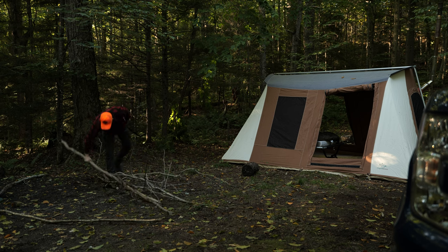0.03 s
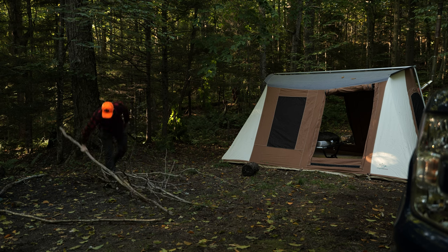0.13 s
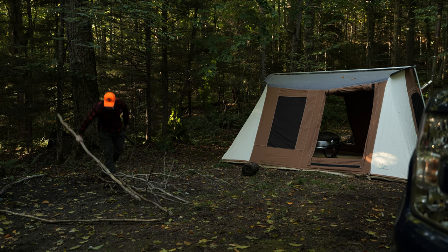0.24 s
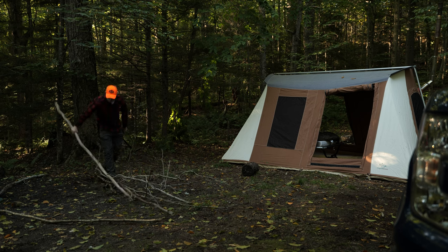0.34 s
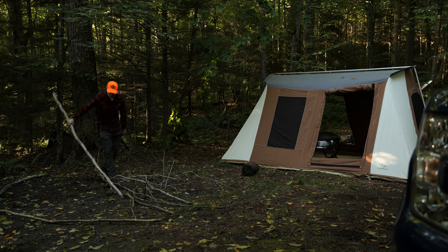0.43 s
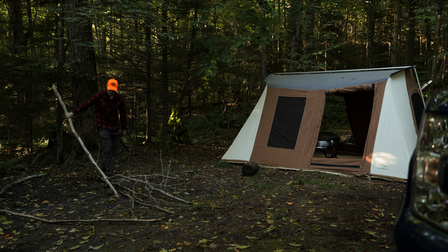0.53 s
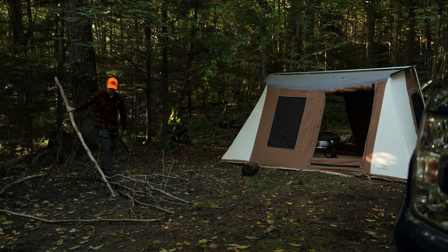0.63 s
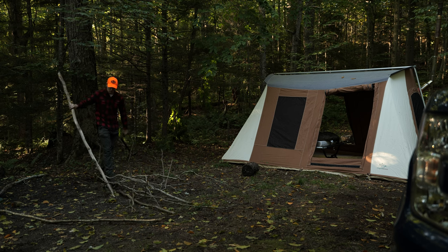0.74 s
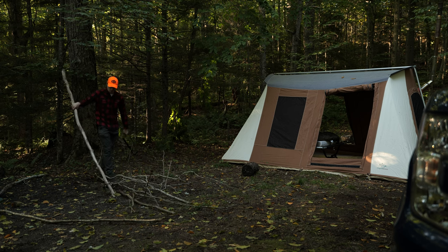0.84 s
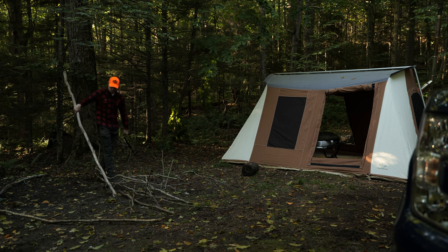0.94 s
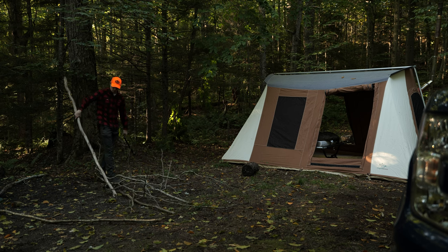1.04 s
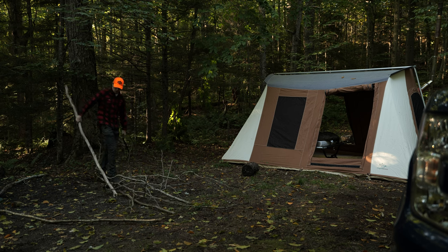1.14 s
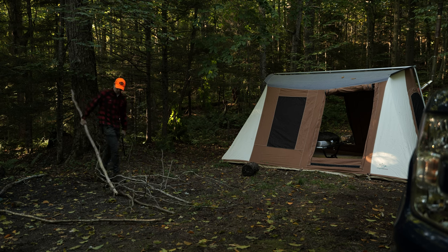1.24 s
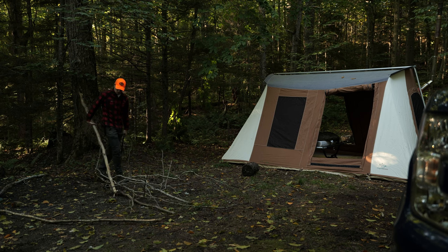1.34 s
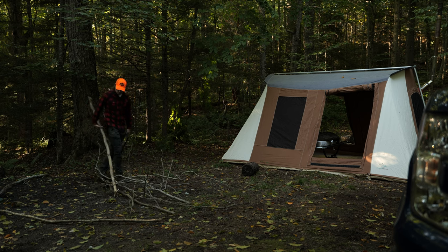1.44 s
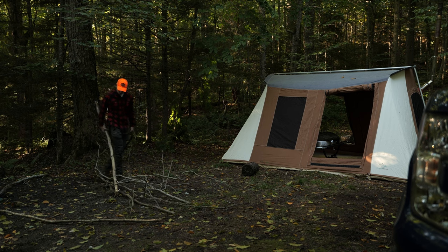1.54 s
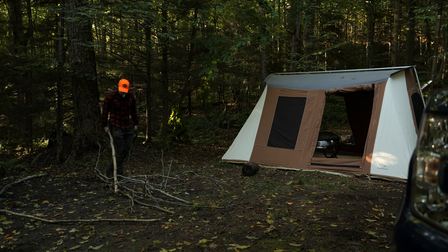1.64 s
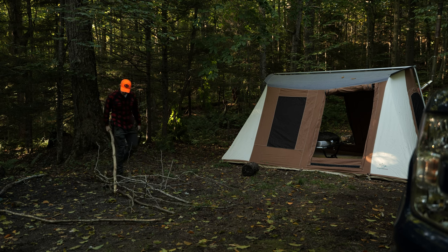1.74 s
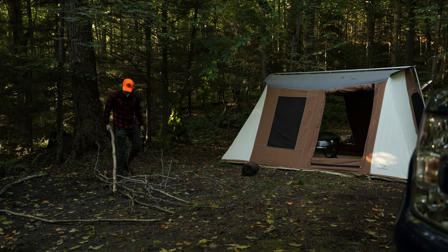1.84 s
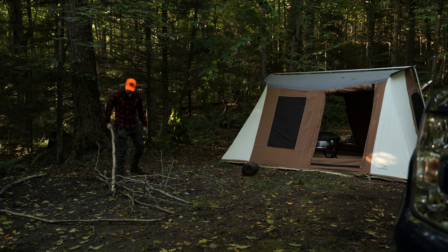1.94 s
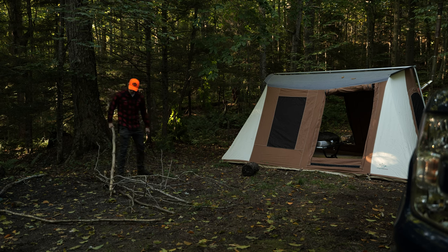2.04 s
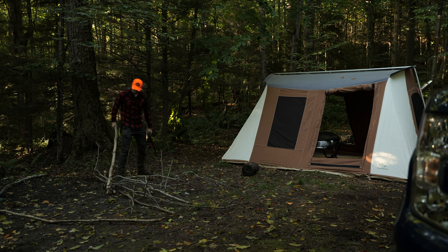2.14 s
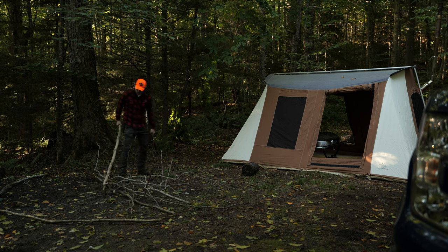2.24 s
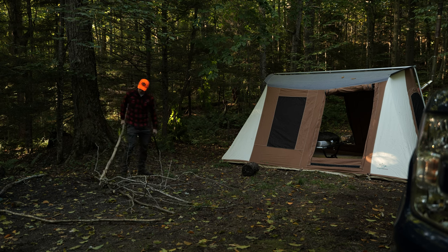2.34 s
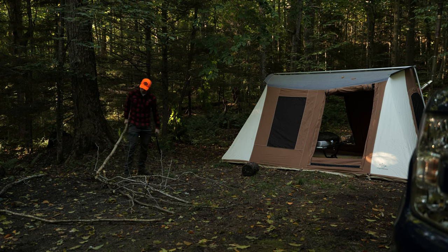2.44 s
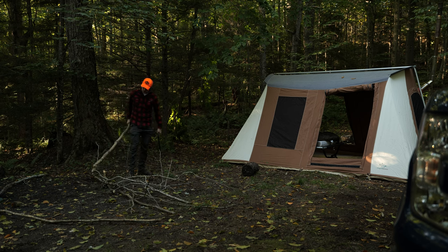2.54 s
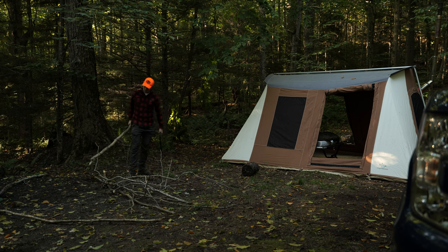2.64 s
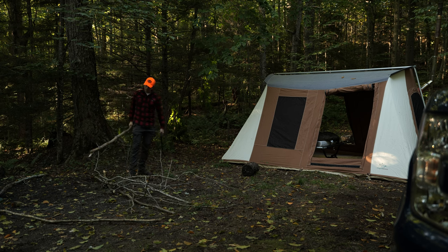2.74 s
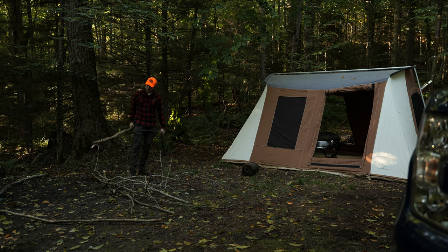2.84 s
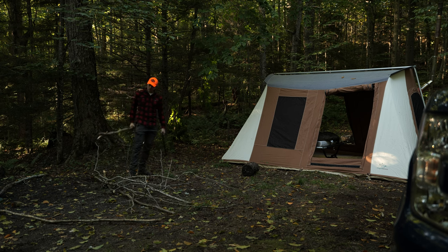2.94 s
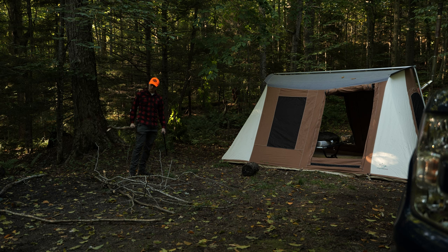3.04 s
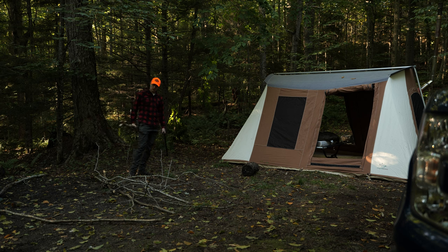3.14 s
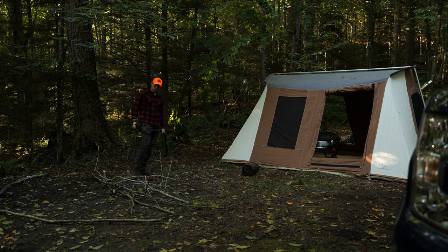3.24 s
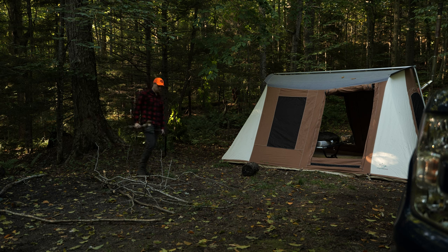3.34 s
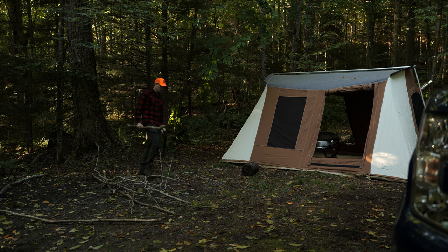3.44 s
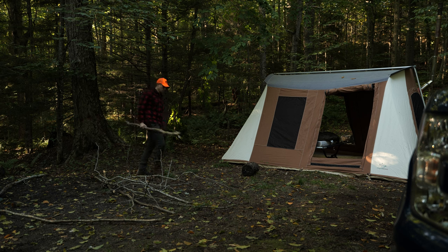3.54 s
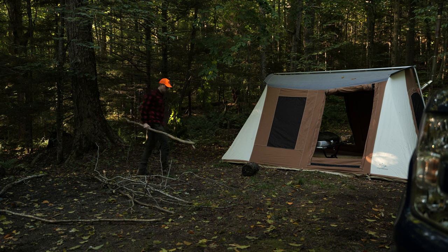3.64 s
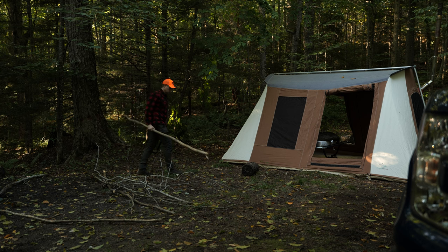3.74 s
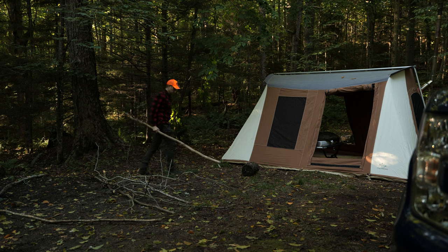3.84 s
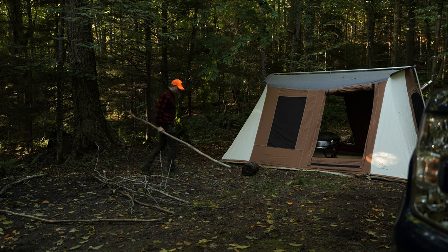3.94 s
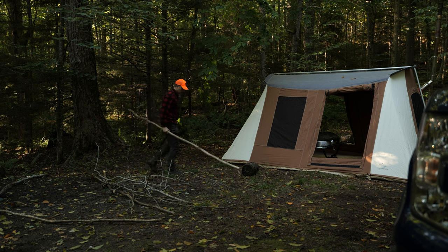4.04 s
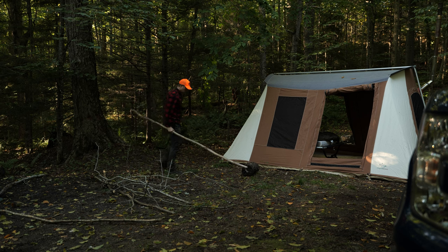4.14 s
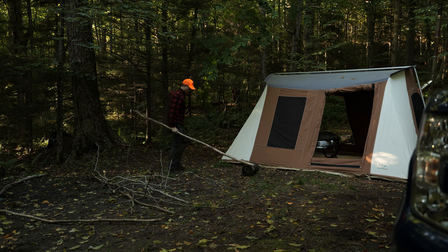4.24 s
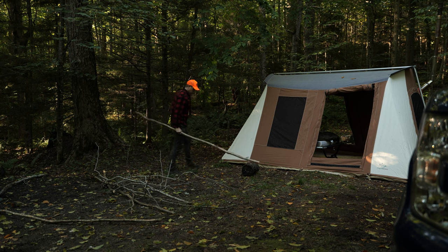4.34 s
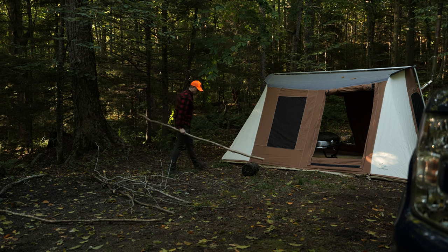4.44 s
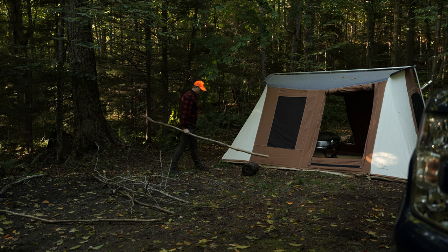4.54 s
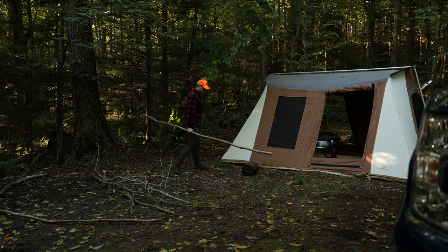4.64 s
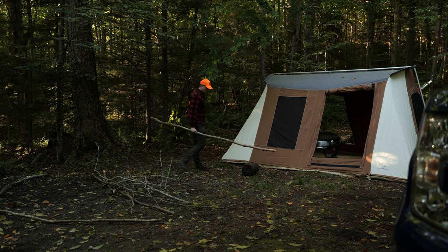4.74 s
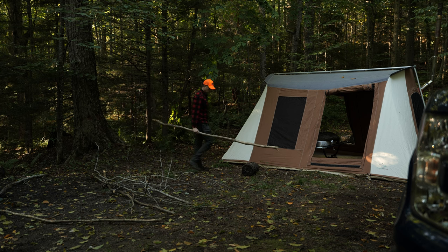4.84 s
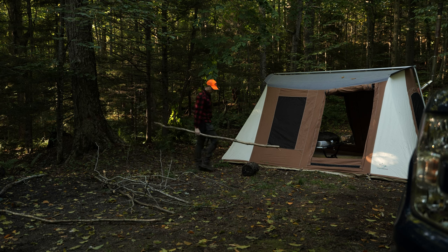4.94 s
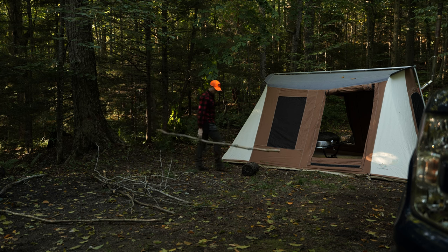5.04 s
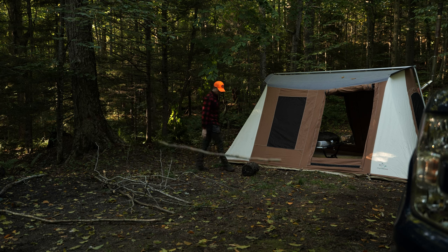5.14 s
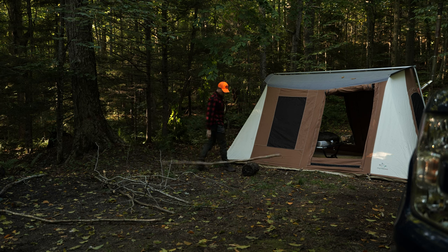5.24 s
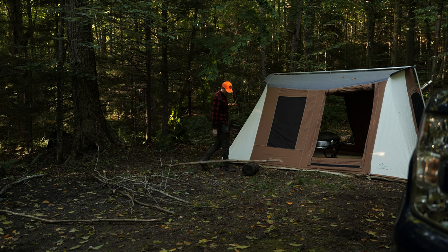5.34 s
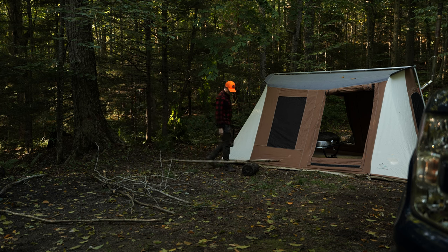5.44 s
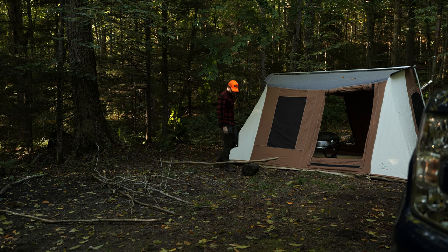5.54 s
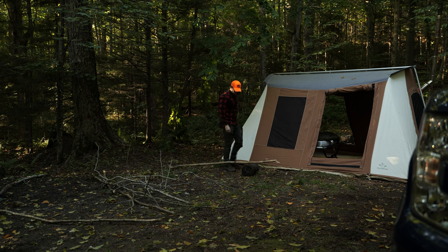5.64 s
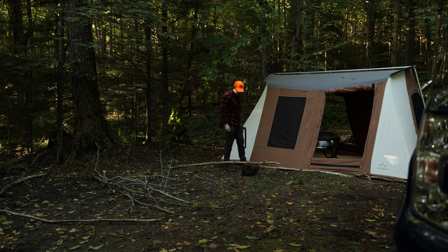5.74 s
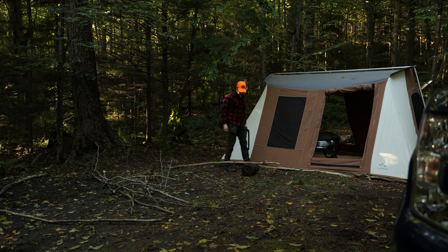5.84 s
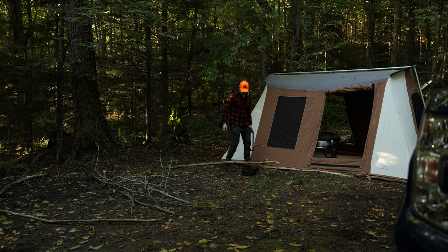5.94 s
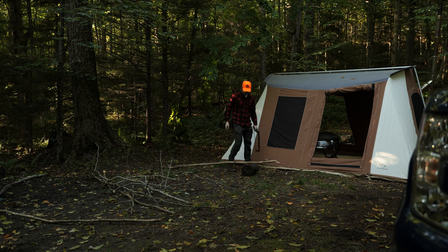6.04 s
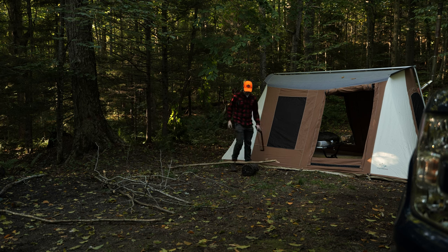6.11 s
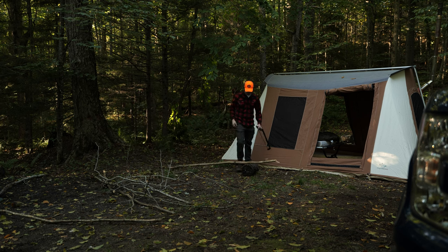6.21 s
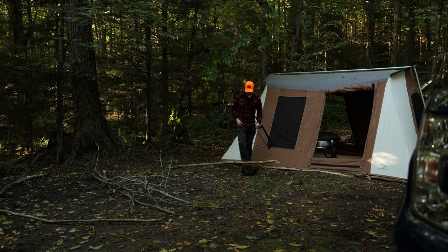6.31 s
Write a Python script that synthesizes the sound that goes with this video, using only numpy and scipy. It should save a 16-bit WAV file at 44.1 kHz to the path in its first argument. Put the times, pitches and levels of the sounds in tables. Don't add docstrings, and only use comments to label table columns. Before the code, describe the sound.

Quiet woodland heard from a distant, centred microphone, with soft steady wind, faint hiss and dull short echoes from trunks. From 0 to 0.65 seconds a dead branch is pulled from brush: thick leaf crackle, rough scraping, a sharp hollow knock near 0.28, rapid clatter and a low bump at 0.53. Smaller knocks and ticks come around 0.9 and 1.05. From 1.6 to 2.4 the tip catches, giving brittle snaps, rustles and a bright tap at 2.35. It thins to sparse ticks until 3.4, when soft leafy steps and popping sticks begin, firmer at 4.2 and 4.4 to 4.5. At 5.29 wood knocks down; at 5.38 comes the loudest deep thump with dry cracking, then bounces at 5.44, 5.59 and 5.73. Faint settling and leaf ticks fade into wind by 6.4.

```python
import sys
import numpy as np
from scipy import signal
from scipy.fft import rfft, irfft
from scipy.io import wavfile

SR = 44100
rng = np.random.default_rng(int(sys.argv[2]) if len(sys.argv) > 2 else 0)


def transcribe(signal):
    frames = np.atleast_2d(signal).T
    limited = np.clip(frames, -1, 1)
    pcm = np.round(limited * 32767).astype(np.int16)
    wavfile.write(sys.argv[1], SR, pcm)


def linear_from_db(decibels):
    return 10 ** (np.asarray(decibels, float) / 20)


N = 281005

# [f/Hz, density/dB per Hz]
SOIL_SPECTRUM = [(30, -7), (60, -7.5), (110, -1.5), (220, -2.5), (400, -8)]


def rms_one(x):
    return x / np.sqrt(np.mean(x ** 2) + 1e-20)


def coloured(x, spectrum):
    hz, db = np.transpose(spectrum)
    grid_hz = np.fft.rfftfreq(4096, 1 / SR) + 1
    gain = linear_from_db(np.interp(np.log(grid_hz), np.log(hz), db, left=-70, right=db[-1] - 20))
    cepstrum = irfft(np.log(gain))
    cepstrum[1:2048] *= 2
    cepstrum[2049:] = 0
    response = irfft(np.exp(rfft(cepstrum)))
    return signal.fftconvolve(x, response / np.linalg.norm(response))[:len(x)]


def drift(rate_hz):
    r = np.exp(-2 * np.pi * rate_hz / SR)
    smooth = signal.lfilter([1], [1, -2 * r, r * r], rng.standard_normal(N + SR))
    return rms_one(smooth[SR:])


def ring(x, hz, t60_s):
    r = linear_from_db(-60 / (t60_s * SR))
    w = 2 * np.pi * hz / SR
    return signal.lfilter([0, np.sin(w)], [1, -2 * r * np.cos(w), r * r], x)


def add(out, at_s, sound):
    at = round(at_s * SR)
    out[at:at + len(sound)] += sound[:N - at]


def wind():
    # [f/Hz, density/dB per Hz]
    spectrum = [(18, -47), (30, -17), (118, -6), (170, -9.5), (221, -3), (374, -4.5), (499, -2.5),
                (721, -4.5), (780, -4), (913, -7.5), (4080, -17), (16000, -23.5)]
    level_db = -63.5 + 0.083 * drift(0.82)
    return linear_from_db(level_db) * coloured(rng.standard_normal(N), spectrum)


def random_breaks(per_s, sizes):
    return sizes * rng.choice([-1, 1], N) * (rng.random(N) < per_s / SR)


def crackle(per_s, spread_db, clump_db, smooth):
    breaks = random_breaks(per_s, linear_from_db(spread_db * np.minimum(rng.exponential(1, N), 4)))
    mixed = rms_one(breaks) + smooth * rng.standard_normal(N)
    return rms_one(mixed * linear_from_db(clump_db * (drift(40) + 1.86 * drift(41))))


def shards(per_s, cycles):
    breaks = random_breaks(per_s, linear_from_db(2.1 * np.minimum(rng.exponential(1, N), 3)))
    pitches_hz = np.geomspace(1500, 7000, 12)
    dealt = rng.integers(0, 12, N)
    return rms_one(sum(ring(breaks * (dealt == k) + 1e-18, hz, cycles / hz)
                       for k, hz in enumerate(pitches_hz)))


def swells(rows, column=1):
    swell_db = 10
    t = np.arange(0, N + 32, 32) / SR
    power = 0
    for row in rows:
        peak_s, rise_s, fall_s = row[0], row[-2], row[-1]
        away = np.where(t < peak_s, (peak_s - t) / rise_s, (t - peak_s) / fall_s)
        power = power + linear_from_db(row[column] - swell_db * away) ** 2
    return np.interp(np.arange(N) / SR, t, np.sqrt(power))


def litter():
    # [peak t/s, crisp level/dB, crumple level/dB, rise/s, fall/s]
    sweeps = [(0.23, -42, -42.5, 0.056, 0.018), (0.32, -39, -39.5, 0.067, 0.085),
              (0.505, -46, -59, 0.024, 0.04), (0.41, -40.5, -36.5, 0.094, 0.025),
              (0.64, -49.5, -44.5, 0.38, 0.51), (0.92, -47, -44.5, 0.024, 0.029),
              (1.09, -58, -50.5, 0.083, 0.0074), (1.41, -55, -49.5, 0.047, 0.21),
              (1.585, -50, -52.5, 0.02, 0.031), (1.635, -52, -50, 0.024, 0.024),
              (1.685, -46.5, -40.5, 0.016, 0.025), (1.745, -50, -45, 0.032, 0.066),
              (1.9, -53, -53, 0.037, .03), (1.97, -48.5, -50.5, 0.042, 0.054),
              (2.13, -45, -44.5, 0.052, 0.059), (2.3, -52.5, -46.5, .05, .03),
              (2.362, -53, -50, .006, 0.073), (2.66, -54.5, -52, 0.19, 0.084)]
    # [peak t/s, crisp level/dB, crumple level/dB, rise/s, fall/s]
    treads = [(3.42, -52.5, -55.5, 0.083, 0.076), (3.72, -53, -66, 0.084, 0.11),
              (3.82, -52.5, -52, 0.094, 0.046), (3.875, -52, -57, 0.028, 0.011),
              (4.15, -61, -60, 0.079, 0.016), (4.195, -59, -54, 0.0066, 0.12), (4.374, -53, -51, .003, .2),
              (4.47, -43, -46, 0.047, 0.039), (4.52, -45, -56, .04, 0.036), (4.67, -58.5, -65, 0.11, 0.062),
              (4.04, -62, -62, 0.065, 0.053), (4.9, -56, -60, 0.081, 0.026),
              (5.09, -55.5, -58.5, 0.12, 0.034), (5.18, -55.5, -49.5, 0.036, .08),
              (5.292, -44, -36.5, 0.0094, 0.019), (5.33, -58, -43.5, 0.012, 0.089),
              (5.389, -41, -38, 0.007, 0.022), (5.44, -49, -42, 0.031, 0.045),
              (5.597, -55, -45.5, 0.0055, 0.018), (5.725, -46.5, -47, 0.031, 0.024),
              (5.8, -57, -55, 0.029, 0.071), (6.16, -66, -60.5, 0.22, 0.14), (6.365, -91, -71, .02, .05)]
    # [peak t/s, level/dB, rise/s, fall/s]
    scrapes = [(0.005, -46, 0.016, 0.45), (0.285, -30, 0.011, 0.024), (0.34, -43, .05, 0.39),
               (0.415, -35, 0.045, 0.04), (0.535, -34, 0.016, .03), (0.6, -48.5, 0.11, 0.16),
               (0.875, -48, 0.01, 0.1), (1.1, -48.5, 0.071, 0.0086), (1.41, -48.5, .03, 0.05),
               (1.585, -50, 0.032, 0.14), (1.69, -42, 0.015, 0.073), (1.95, -53.5, 0.22, 0.29),
               (2.05, -46, 0.0055, 0.13), (2.295, -43.5, 0.016, 0.037), (2.365, -35.5, 0.0068, 0.011),
               (2.66, -50.5, 0.11, 0.057), (3.75, -55.5, 0.068, 0.23), (4.195, -52, .01, 0.018),
               (4.42, -42.5, 0.032, 0.024), (4.5, -44, 0.043, 0.026), (5.295, -39, 0.0052, 0.034),
               (5.435, -35.5, 0.026, 0.027), (5.61, -47, 0.013, 0.016), (5.73, -51.5, 0.052, 0.014)]
    # [t/s, level/dB]
    effort = [(0, -52.5), (0.2, -57), (0.3, -51), (0.5, -59.5), (0.64, -54.5), (0.85, -68), (1.2, -69.5),
              (1.7, -69.5), (2.3, -64.5), (3.2, -73.5), (3.65, -66), (4, -67.5), (4.5, -65), (5, -69),
              (5.35, -67.5), (5.55, -63.5), (5.75, -67), (6.37, -70.5)]
    # [f/Hz, density/dB per Hz]
    crisp_spectrum = [(2060, -11), (3500, -11.5), (4080, -6.5), (4510, -5), (11700, -11), (13500, -11.5),
                      (16000, -14.5)]
    # [f/Hz, density/dB per Hz]
    crumple_spectrum = [(1200, -13.5), (2000, -7.5), (2600, -3.5), (3500, 1), (4200, -2.5), (6000, -15)]
    # [f/Hz, density/dB per Hz]
    scrape_spectrum = [(200, -10), (400, -5), (650, -4), (1050, -1), (1500, -11), (2400, -12)]

    effort_s, effort_db = np.transpose(effort)
    soil_db = np.interp(np.arange(N) / SR, effort_s, effort_db)
    stir = linear_from_db(soil_db - soil_db.mean())
    shared = crackle(1200, spread_db=-2, clump_db=1, smooth=0.78)

    own = crackle(4000, spread_db=-5, clump_db=0.6, smooth=0.77)
    crisp = coloured(rms_one(shared + 0.96 * own), crisp_spectrum)
    snaps = np.diff(crackle(140, spread_db=2.3, clump_db=2.5, smooth=0.054), prepend=0)
    crisp += 0.35 * coloured(snaps, crisp_spectrum)
    crisp *= np.hypot(linear_from_db(-3.5) * swells(sweeps + treads), linear_from_db(-69.5) * stir)

    own = crackle(1800, spread_db=-4, clump_db=1, smooth=0.24)
    crumple = coloured(rms_one(shared + 0.99 * own), crumple_spectrum)
    crumple += 0.4 * shards(per_s=200, cycles=10)
    crumple *= np.hypot(linear_from_db(-2.5) * swells(sweeps + treads, column=2), linear_from_db(-62.5) * stir)

    own = crackle(700, spread_db=0, clump_db=1, smooth=0.28)
    scrape = coloured(rms_one(0.59 * shared + own), scrape_spectrum)
    scrape *= np.hypot(linear_from_db(-5.5) * swells(scrapes), linear_from_db(-67.5) * stir)

    soil = coloured(crackle(200, spread_db=0, clump_db=0, smooth=1.64), SOIL_SPECTRUM)
    return crisp + crumple + scrape + linear_from_db(soil_db) * soil


def ticks():
    # [t/s, peak level/dB, centre f/Hz]
    leaf_breaks = [(0.0105, -29.5, 3400), (0.3725, -28, 3900), (0.427, -29, 3500), (0.6195, -38.5, 3720),
                   (0.9207, -34, 3300), (0.9554, -45, 3540), (1.0385, -38, 5000), (1.0415, -47, 3200),
                   (1.045, -41.5, 3250), (1.047, -43, 5100), (1.085, -47, 4800), (1.304, -51, 3490),
                   (1.571, -45, 3460), (1.625, -42.5, 3190), (1.672, -35.5, 3420), (1.731, -32.5, 2900),
                   (1.7365, -31, 3180), (1.75, -35, 3300), (1.8842, -35, 3040), (1.8921, -36.5, 2900),
                   (1.9333, -47, 3730), (1.964, -36, 3420), (1.968, -38, 3570), (1.9762, -32.5, 3540),
                   (1.982, -42, 2800), (2.08, -45, 3420), (2.122, -39, 3620), (2.284, -39, 2570),
                   (2.354, -31.5, 3630), (2.4022, -46, 3000), (2.9093, -44, 4200), (3.1337, -47, 3760),
                   (3.4357, -44, 3260), (3.74, -39.5, 3280), (3.869, -39, 4000), (3.9946, -56, 3240),
                   (4.3715, -42, 3870), (4.3806, -38, 3320), (4.4652, -39, 8000), (4.4904, -35, 3500),
                   (5.3817, -19, 3580), (5.3845, -19.5, 3650), (5.393, -38, 3600), (5.4415, -24.5, 3650),
                   (5.441, -29, 5200), (5.6723, -43, 3780), (5.7235, -29, 3170), (6.3567, -40.5, 3250)]
    # [t/s, peak level/dB, centre f/Hz]
    stem_breaks = [(0.862, -37.5, 9000), (1.04, -50, 5200), (1.179, -51, 11000), (1.6769, -33.5, 6460),
                   (1.7434, -26.5, 6050), (1.9333, -34, 13000), (1.957, -41, 7060), (2.0796, -31.5, 6330),
                   (2.3542, -33, 10700), (3.6037, -43, 9530), (3.8044, -42, 6490), (4.1829, -43, 10000),
                   (4.437, -31, 6280), (4.49, -30, 7850), (5.298, -31, 10000), (5.3815, -21.5, 5500),
                   (5.428, -25, 5800), (5.886, -37, 13400)]
    out, t = np.zeros(N), np.arange(SR // 40) / SR
    for rows, burst_s, cycles, edge in (leaf_breaks, 0.0018, 16, 0.07), (stem_breaks, 0.0007, 4, 0.45):
        for at_s, peak_db, hz in rows:
            snap = np.diff(rng.standard_normal(len(t) + 1)) * np.exp(-t / burst_s)
            body = ring(snap, hz, cycles / hz)
            add(out, at_s, linear_from_db(peak_db) * (body / abs(body).max() + edge * snap / abs(snap).max()))
    return out


def thumps():
    # [t/s, peak level/dB, first f/Hz, last f/Hz, time until the soil stops it/s]
    blows = [(0.026, -43, 120, 76, 0.089), (0.256, -38, 338, 201, .012), (0.531, -30.5, 266, 97, 0.062),
             (1.73, -43, 231, 108, 0.025), (4.421, -49, 350, 250, 0.013), (5.288, -37, 150, 70, 0.061),
             (5.3843, -13, 360, 98, .032), (5.44, -36.5, 201, 62.4, 0.25), (5.59, -38, 198, 97, 0.024),
             (5.7295, -30, 140, 92, .028), (5.791, -40, 120, 62.4, 0.2)]
    t60_s, grit_cut_hz = 0.67, 630
    out, t = np.zeros(N), np.arange(SR // 2) / SR
    soil_lowpass = signal.butter(2, grit_cut_hz, fs=SR, output="sos")
    for at_s, peak_db, first_hz, last_hz, held_s in blows:
        turns = np.cumsum(last_hz + (first_hz - last_hz) * np.exp(-t / 0.005)) / SR
        shape = (1 - np.exp(-t / 0.0003)) * (0.28 + 0.72 * np.exp(-t / 0.003))
        shape *= 0.053 + 0.81 * np.exp(-np.maximum(t - held_s, 0) / 0.019)
        upper = 0.28 * (1 - np.exp(-t / 0.037)) * np.exp(-t / 0.099) * np.sin(2 * np.pi * 160 * t)
        grit = 0.35 * coloured(rng.standard_normal(len(t)), SOIL_SPECTRUM)
        grit = signal.sosfilt(soil_lowpass, grit)
        level = linear_from_db(peak_db - 60 * t / t60_s)
        add(out, at_s, level * shape * (np.sin(2 * np.pi * turns) + upper + grit))
    return out


def knocks():
    # [t/s, peak level/dB, ring f/Hz,
    # t60/s]
    wood_blows = [(0.11, -38.5, 1140, 0.037), (0.258, -33.5, 300, .02), (0.2755, -23, 1110, .03),
                  (0.2774, -15.5, 1057, 0.026), (0.2816, -23, 1160, .03), (0.289, -29, 483, .03),
                  (0.323, -29, 1160, .03), (0.327, -29, 1160, .03), (0.333, -28, 1150, .025),
                  (0.341, -28, 1060, 0.027), (0.346, -39, 1130, 0.027), (0.357, -30, 1130, 0.021),
                  (0.3655, -31, 1030, 0.022), (0.381, -30.5, 1100, 0.027), (0.414, -32, 1110, 0.025),
                  (0.416, -35.5, 440, 0.056), (0.502, -37, 514, .025), (0.5235, -29.5, 616, 0.026),
                  (0.5275, -25.5, 800, .03), (0.536, -33, 380, .04), (0.549, -35.5, 563, 0.052),
                  (0.711, -47.5, 255, .03), (0.8616, -36.5, 1000, 0.035), (0.8675, -36, 906, 0.041),
                  (0.8944, -34, 1670, 0.022), (0.897, -35, 950, 0.04), (0.956, -43, 900, 0.013),
                  (1.092, -43, 1200, 0.022), (1.682, -33.5, 1710, .05), (1.692, -37.5, 915, 0.042),
                  (1.695, -38, 1700, 0.037), (1.715, -43, 630, .04), (2.0443, -33, 590, 0.014),
                  (2.284, -48, 900, .02), (2.3, -45, 595, 0.016), (2.354, -25.5, 1740, .01),
                  (2.3575, -29.5, 1020, 0.036), (5.2848, -18.5, 629, 0.042), (5.2855, -28.5, 362, 0.047),
                  (5.287, -32.5, 990, 0.031), (5.287, -33, 1780, 0.024), (5.303, -35, 690, .03),
                  (5.333, -38, 1404, 0.034), (5.354, -39, 1390, .03), (5.428, -38, 840, 0.037),
                  (3.6335, -40.5, 515, 0.015), (3.6525, -42.5, 320, .03), (3.671, -42.5, 427, 0.016),
                  (3.787, -41.5, 338, .02), (4.154, -44, 990, .02), (4.183, -34, 1140, 0.016),
                  (4.2, -35, 1260, .02), (4.272, -50, 690, 0.034), (4.4035, -39, 810, 0.013),
                  (4.408, -38.5, 1020, 0.018), (4.422, -37.5, 520, 0.026), (5.3845, -22.5, 243, 0.035),
                  (5.391, -28, 190, 0.16), (5.4268, -29.5, 705, .02), (5.718, -40.5, 324, 0.025),
                  (5.901, -46.5, 1000, .02), (5.73, -37, 111, 0.082)]
    rise_cycles = 0.28
    out, t = np.zeros(N), np.arange(SR // 8) / SR
    for at_s, peak_db, hz, t60_s in wood_blows:
        shape = (1 - np.exp(-t * hz / rise_cycles)) * linear_from_db(-60 * t / t60_s)
        wood = shape * (np.sin(2 * np.pi * hz * t) + 0.27 * np.sin(2 * np.pi * 1.17 * hz * t))
        add(out, at_s, linear_from_db(peak_db) * wood / abs(wood).max())
    return out


def twigs():
    # [t/s, peak level/dB, ring f/Hz, crack level/dB]
    pile_hits = [(0.16, -38, 2120, -10), (0.271, -22.5, 925, -3.5), (0.293, -30, 2530, 2),
                 (0.3, -27.5, 930, 1), (0.323, -38, 1190, -13), (0.335, -40, 1190, -10),
                 (0.358, -35, 1150, -4), (0.393, -46, 1190, 13), (0.409, -28.5, 1060, -6),
                 (0.496, -37, 457, -9), (0.522, -30.5, 2060, -0.5), (0.53, -32.5, 410, 1),
                 (0.531, -31, 610, -13), (0.596, -35.5, 980, -14), (0.86, -39, 1620, -16),
                 (0.897, -44, 909, 8), (1.037, -51, 1220, 13.5), (1.179, -50.5, 2000, 1)]
    # [t/s, peak level/dB, ring f/Hz, crack level/dB]
    tip_hits = [(1.676, -40, 1630, 3.5), (1.681, -36, 1700, -12), (1.68, -39, 940, -15),
                (1.733, -36.5, 1580, 1), (1.883, -45, 870, -8), (1.976, -52, 915, 10),
                (2.045, -42, 460, -22), (2.045, -38, 770, -14), (2.159, -41.5, 1250, 0),
                (2.253, -50, 1160, 6), (2.353, -34.5, 1770, 6.5), (2.36, -37, 1020, -6),
                (2.402, -50, 2020, 2)]
    # [t/s, peak level/dB, ring f/Hz, crack level/dB]
    boot_hits = [
        (3.408, -47.5, 1390, 5.5),
        (3.781, -52, 1400, 13),
        (4.183, -40.5, 1370, 5.5),
        (4.199, -45, 1300, 8),
        (4.236, -49, 1250, -11),
        (4.422, -46, 530, 9),
        (4.499, -44.5, 647, 10),
        (5.163, -60, 2270, 17),
    ]
    # [t/s, peak level/dB, ring f/Hz, crack level/dB]
    drop_hits = [
        (5.286, -27, 785, 4.5),
        (5.323, -41, 1400, 13),
        (5.333, -39, 1420, -17),
        (5.355, -39, 1410, -5),
        (5.427, -28, 464, -9),
        (5.44, -31.5, 460, -2),
        (5.59, -34, 477, 3.5),
        (5.7, -52, 900, 13),
        (5.719, -49, 1180, 9),
        (5.901, -48, 447, -5),
    ]
    # [ring t60/s, contact/s]
    pile_wood = (0.016, 0.0048)
    tip_wood = (0.023, 0.0044)
    boot_wood = (0.013, 0.0035)
    drop_wood = (0.032, 0.0048)
    # [f ratio, level/dB]
    overtones = [(0.599, -24), (1.004, 12), (1.1, -4.5), (1.6, 2), (2.1, -11), (2.9, -13)]
    # [f/Hz, density/dB per Hz]
    fibre_spectrum = [(300, -37), (600, -12), (1800, 2), (2500, 3.5), (3500, 8), (4500, -10.5),
                      (9000, -9.5), (16000, -37)]

    first_touch = 4.1
    out, t = np.zeros(N), np.arange(SR // 8) / SR
    groups = (pile_hits, pile_wood), (tip_hits, tip_wood), (boot_hits, boot_wood), (drop_hits, drop_wood)
    for rows, (t60_s, contact_s) in groups:
        force = (1 - np.exp(-t / 0.00025)) * np.exp(-t / contact_s)
        for at_s, peak_db, hz, crack_db in rows:
            fibres = rng.standard_normal(len(t)) * force + 1e-18
            fibres[0] = first_touch
            fibres = signal.lfilter([1], [1, -np.exp(-2 * np.pi * hz * 5.1 / SR)], fibres)
            fibres = signal.sosfilt(signal.butter(2, 0.3 * hz, "high", fs=SR, output="sos"), fibres)
            wood = sum(linear_from_db(db) * ring(fibres, hz * ratio, 0.91 * t60_s / ratio ** 2.7)
                       for ratio, db in overtones)
            crack = coloured(rng.standard_normal(len(t)) * force, fibre_spectrum)
            both = wood / abs(wood).max() + linear_from_db(crack_db) * crack / abs(crack).max()
            add(out, at_s, linear_from_db(peak_db) * both)
    return out


def trunks(x):
    t60_s, level_db, dullness = 0.35, -16.5, 0.73
    t = np.arange(SR // 2) / SR
    echoes = rng.standard_normal(len(t)) * linear_from_db(-60 * t / t60_s) * (t > 0.006)
    echoes = signal.lfilter([1], [1, -dullness], echoes)
    return linear_from_db(level_db) * signal.fftconvolve(x, echoes / np.linalg.norm(echoes))[:N]


def scene():
    cracks = twigs() + ticks()
    blows = knocks()
    echoes = trunks(cracks + 0.3 * blows)
    centre = wind() + litter() + cracks + blows + thumps() + echoes
    return np.array([centre, centre])


def low_pass(x):
    return signal.sosfilt(signal.butter(12, 15750, fs=SR, output="sos"), x)


def record(dry):
    # [f/Hz, level/dB]
    spread_spectrum = [(60, -46), (250, -44), (700, -29), (2400, -14), (4400, -11), (8000, -4.5),
                       (16500, -3.5)]
    # [f/Hz, density/dB per Hz]
    hiss_spectrum = [(18, -46), (30, -3), (273, -3.5), (721, -2.5), (1010, -6), (1810, -8), (4080, -6.5),
                     (4530, -7), (13700, -10), (16000, -8)]
    low_cut_hz, top_cut_hz = 40, 16900
    leak_db, hiss_db = -16.5, -71

    dip = signal.butter(1, [4150, 4800], "band", fs=SR)
    dry = dry - 0.35 * signal.lfilter(*dip, dry)
    leak = coloured(dry[0] * drift(27), spread_spectrum)
    hiss = coloured(rng.standard_normal(N), hiss_spectrum)
    side = linear_from_db(leak_db) * leak + linear_from_db(hiss_db) * hiss
    cuts = np.vstack([signal.butter(4, low_cut_hz, "high", fs=SR, output="sos"),
                      signal.cheby2(10, 60, top_cut_hz, fs=SR, output="sos")])
    return low_pass(signal.sosfilt(cuts, dry + side * [[1], [-1]]))


dry = scene()
out = record(dry)
transcribe(out)
```